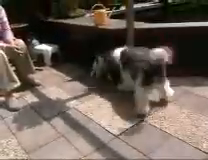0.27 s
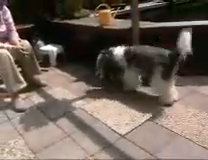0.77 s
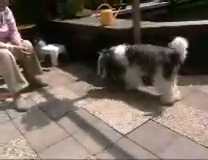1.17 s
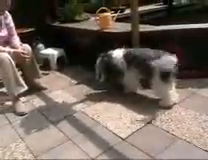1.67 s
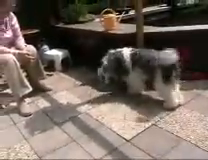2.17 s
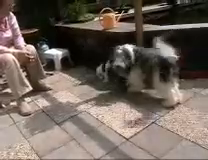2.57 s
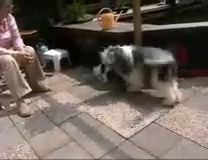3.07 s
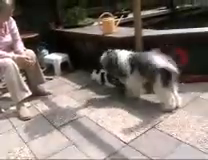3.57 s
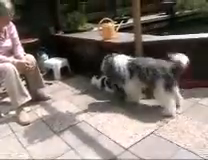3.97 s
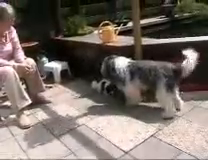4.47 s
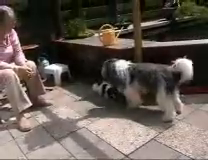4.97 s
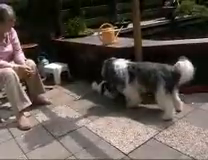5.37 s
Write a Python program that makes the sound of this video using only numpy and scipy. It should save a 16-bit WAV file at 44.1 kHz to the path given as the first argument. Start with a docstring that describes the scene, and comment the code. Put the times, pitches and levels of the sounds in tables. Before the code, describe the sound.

Six loud, rough barks from a big dog ring across a patio, over a faint hum and hiss.

```python
"""A dog barking on a patio

A big shaggy dog barks six times at a pup, over a low hum and faint hiss. Vocal-fold pulses and
turbulent breath excite its throat and mouth: each bark starts hoarse, leaps about an octave to a
rough note and sags. Between barks the dog huffs and claws tick on the slabs. Patio and garden
reverberate, and a limiter ducks everything after each loud bark."""
import sys
import numpy as np
from scipy import signal
from scipy.fft import rfft, irfft
from scipy.io import wavfile
from scipy.ndimage import uniform_filter1d, minimum_filter1d

SR = 44100
rng = np.random.default_rng(int(sys.argv[2]) if len(sys.argv) > 2 else 0)


def inscribe(sig):
    """Save sig as 16-bit PCM at rate SR to the path in sys.argv[1].

    A 1-D sig is mono; a 2-D sig holds one channel per row.
    Samples are clipped to [-1, 1] before scaling.
    """
    pcm = np.round(np.clip(np.atleast_2d(sig).T, -1, 1) * 32767)
    wavfile.write(sys.argv[1], SR, pcm.astype(np.int16))


N = 248705
TIME = np.arange(N) / SR
BINS = np.fft.rfftfreq(N, 1 / SR)
BAND_LIMIT_HZ = 8800


def gain_of(db):
    """The decibel scale: 20 dB is a factor of ten in amplitude."""
    return 10 ** (np.asarray(db) / 20)


def unit_rms(x):
    """Normalisation to a mean power of 1."""
    return x / np.sqrt(np.mean(x ** 2) + 1e-20)


def steadied(x, size=901):
    """Division by the short-term rms flattens the envelope but keeps the grain of single cycles."""
    window = signal.windows.hann(size)
    power = signal.convolve(x ** 2, window, "same") / signal.convolve(np.ones(len(x)), window, "same")
    return x / np.sqrt(abs(power) + 1e-12)


def curve_at(points, hz):
    """Interpolation of (frequency, value) points on a logarithmic frequency axis."""
    known_hz, values = np.transpose(points)
    return np.interp(np.log(hz + 1), np.log(known_hz + 1), values)


def add(mix, start, sound):
    """Superposition: a sound sums into the mix from its start time."""
    part = mix[max(round(start * SR), 0):][:len(sound)]
    part += sound[:len(part)]


def noise(spectrum):
    """Spectral shaping colours white noise; the result has rms 1."""
    return unit_rms(irfft(rfft(rng.standard_normal(N)) * gain_of(curve_at(spectrum, BINS)), N))


def wander(t, rate_hz):
    """Random modulation: low-passed noise with an rms near 1."""
    slow = irfft(rfft(rng.standard_normal(N)) / (1 + (BINS / rate_hz) ** 4), N)
    return unit_rms(slow)[:len(t)]


def resonate(x, hz, width_hz):
    """Two equal resonators in cascade give a peak with steep skirts."""
    b, a = signal.iirpeak(hz, hz / width_hz, SR)
    return signal.lfilter(b, a, signal.lfilter(b, a, x))


# swells and fades of the hum: (time [s], relative level [dB])
HUM_SWELLS = [(0.0, -52), (0.1, -49.5), (0.26, -46), (1.24, -46), (1.41, -50.5), (1.52, -45), (1.64, -66),
              (1.76, -45), (2.2, -51.5), (2.58, -54), (2.82, -42.5), (3.06, -42), (4.2, -43.5), (4.4, -40),
              (4.74, -50.5), (4.98, -46.5), (5.36, -44.5), (5.5, -56)]

def hum(hz=111.2, level_db=-1, waver_db=2.5, drift=0.0094, flutter=0.052, drone_db=-11):
    """A tone modulated in pitch and amplitude under a narrow-band drone, as of a distant motor."""
    swell_db = np.interp(TIME, *np.transpose(HUM_SWELLS)) + waver_db * wander(TIME, 5.7)
    cycles = np.cumsum(hz * (1 + drift * wander(TIME, 6.1))) / SR
    tone = unit_rms(np.sin(2 * np.pi * cycles) * (1 + flutter * wander(TIME, 42)))
    drone = gain_of(drone_db) * unit_rms(resonate(rng.standard_normal(N), hz=195, width_hz=89))
    return gain_of(level_db + swell_db) * (tone + drone)


# outdoor background: (frequency [Hz], relative spectral density [dB])
AIR_SPECTRUM = [(25, -25.5), (52, -6.5), (112, -4), (146, -10.5), (192, -6.5), (329, -12), (592, -18),
                (653, -13.5), (899, -16.5), (1180, -18.5), (1400, -16), (1790, -19.5), (5660, -25),
                (8800, -31.5), (11400, -52), (19400, -120)]
# likeness of the background at the two ears: (frequency [Hz], correlation [0-1])
AIR_CORRELATION = [(30, 0.57), (70, 0.92), (250, 1), (1000, 0.91), (3000, 0.72), (6000, 1)]

def air(level_db=-45, flicker_db=1.28):
    """Partial coherence: sum and difference of two noises give rumble and hiss alike in both ears."""
    correlation = curve_at(AIR_CORRELATION, BINS)
    mid = irfft(rfft(noise(AIR_SPECTRUM)) * np.sqrt((1 + correlation) / 2), N)
    side = irfft(rfft(noise(AIR_SPECTRUM)) * np.sqrt((1 - correlation) / 2), N)
    return np.array([mid + side, mid - side]) * gain_of(level_db + flicker_db * wander(TIME, 36))


# claws on the paving: (time [s], level [dB], centre frequency [Hz], decay time constant [s])
CLAW_TICKS = [(.25, -43.5, 4260, 0.0045), (2.114, -30, 5000, 0.0025), (2.33, -48, 5930, 0.0075),
              (2.843, -34, 3000, 0.0041), (3.011, -41, 2700, .006), (4.434, -41, 3510, 0.0095),
              (5.111, -44, 3720, 0.011), (5.198, -41, 4000, 0.0041), (5.346, -43.5, 4540, 0.013),
              (5.407, -42.5, 5600, 0.0057)]

def claws(width_hz=1500):
    """Impact noise: each claw gives a bright scratch that decays exponentially."""
    ticks, t = np.zeros(N), TIME[:3000]
    for start, db, hz, decay in CLAW_TICKS:
        scratch = unit_rms(resonate(rng.standard_normal(len(t)), hz, width_hz))
        add(ticks, start, gain_of(db) * np.exp(-t / decay) * scratch)
    return ticks


def step(t, centre, time_scale):
    """A sigmoid transition from 0 to 1."""
    return (1 + np.tanh((t - centre) / (2 * time_scale))) / 2


def articulation(row, release_s=0.04, release_db=-33, lead_in_db=-44, hoarse_mouth_hz=1231):
    """Folds and jaws move together: a hoarse start, a leap to the note, a gape, a sag as jaws close."""
    onset, length, lead_in, level_db, change_db = row[:5]
    hoarse_hz, top_hz, end_hz, leap_at, sag_at = row[5:10]
    start_rough, note_rough, start_throat_hz, note_mouth_hz = row[10:14]
    start_mouth_db, note_mouth_db, rasp_db, note_upper_db, hiss_db = row[14:]
    t = np.arange(-lead_in, length + release_s, 1 / SR)
    effort_db = level_db + np.interp(t, [0, length, length + release_s], [0, change_db, change_db + release_db])
    effort_db += lead_in_db * np.maximum(-t / lead_in, 0) ** 0.77  # creeps in, then jumps

    leap, sag = step(t, leap_at, 0.0115), step(t, sag_at, 0.0081)
    strain = np.sin(np.pi * leap) ** 2  # greatest in mid-leap
    gape = np.exp(-((t / sag_at - 0.72) / 0.15) ** 2)
    puff = np.exp(-((t - sag_at + 0.012) / 0.01) ** 2)  # a last breath just before the sag
    rasp_gone = step(t, leap_at + 0.028, 0.0047)

    sag_hz = (end_hz - top_hz) * sag
    pitch_hz = hoarse_hz + (top_hz - hoarse_hz) * leap + sag_hz
    # the voice clears in mid-leap and as it sags, and breaks up with the puff
    rough = start_rough + (note_rough - start_rough) * leap - 0.2 * strain + 0.19 * puff - 0.08 * sag
    rough = np.clip(rough, 0.1, 0.9)
    # formant tuning: the throat settles just above the note and follows part of the sag
    throat_hz = start_throat_hz + (top_hz + 67 - start_throat_hz) * leap + 0.38 * sag_hz
    mouth_hz = hoarse_mouth_hz + (note_mouth_hz - hoarse_mouth_hz) * leap
    flare_db, jaw_db = 8.5 * strain, 8 * gape - 3.5 * sag
    mouth_db = start_mouth_db + (note_mouth_db - start_mouth_db) * leap + flare_db + jaw_db
    upper_db = rasp_db + (note_upper_db - rasp_db) * rasp_gone + flare_db - 2 * puff
    hiss = gain_of(hiss_db) * (0.44 + 0.25 * strain + puff)
    return onset + t, effort_db, pitch_hz, rough, throat_hz, mouth_hz, mouth_db, upper_db, hiss


def vocal_folds(t, pitch_hz, rough, subharmonic=0.63):
    """Jitter, shimmer and period doubling roughen a harmonic pulse train; also returns its phase."""
    jitter = 0.07 * wander(t, 90) + 0.08 * wander(t, 320)
    phase = 2 * np.pi * np.cumsum(pitch_hz * (1 + rough * jitter)) / SR
    pulses = unit_rms(sum(np.cos(k * phase) * (k * pitch_hz < BAND_LIMIT_HZ) for k in range(1, 24)))
    doubling = subharmonic * np.cos(phase / 2)  # strong and weak cycles alternate
    shimmer = 0.7 * wander(t, 150)
    return pulses * (1 + rough * (doubling + shimmer)), phase


def formant(x, hz, width_hz):
    """A moving resonance by heterodyning: shift down to 0 Hz, smooth twice, shift back, level out."""
    carrier = np.exp(2j * np.pi * np.cumsum(hz) / SR)
    pole = np.exp(-np.pi * width_hz / SR)
    baseband = signal.lfilter([(1 - pole) ** 2], [1, -2 * pole, pole ** 2], x / carrier)
    return steadied((carrier * baseband).real)


# upper resonances of the vocal tract: (frequency [Hz], width [Hz], relative level [dB])
UPPER_FORMANTS = [(1920, 1100, 17), (2260, 270, 14), (2560, 530, 6)]
# the barks; leap and sag count from the onset, mouth and upper levels are relative to the throat:
# (onset of full voice [s], length [s], lead-in [s], effort [dB], change over the length [dB],
#  hoarse pitch [Hz], top pitch [Hz], end pitch [Hz], leap time [s], sag time [s],
#  start roughness [0-1], note roughness [0-1], start throat formant [Hz], note mouth formant [Hz],
#  start mouth level [dB], note mouth level [dB], start upper level [dB], note upper level [dB],
#  nose hiss [dB])
BARK_GESTURES = [ (0.347, 0.14, 0.046, -10, 1, 256.1, 727.6, 521, 0.028, 0.156, 0.42, 0.44, 820, 1220, -19, -14, -5.5, -5.5, -22.5),
                 (0.618, 0.1, 0.036, -5, 3, 301.7, 688.8, 476, 0.011, 0.1, 0.4, 0.29, 674, 1385, -4.5, -5.5, -6.5, -24.5, -27),
                 (1.780, 0.140, 0.019, -3, -8.5, 244.5, 690.5, 524.6, 0.019, 0.11, 0.35, 0.43, 660, 1423, -3.5, -4, -9, -13.5, -23.5),
                 (3.092, 0.170, 0.006, -2, -11.5, 332.2, 734.6, 649, 0.025, 0.116, 0.78, 0.482, 808, 1450, 9, -3, -3.5, -17, -22.5),
                 (3.400, 0.11, 0.0094, -3, -5, 321.8, 624, 538, 0.019, 0.126, 0.42, 0.19, 774, 1264, 0.5, -1, -8.5, -19, -28.5),
                 (3.797, 0.12, 0.00873, -4, -3.5, 335.5, 634.4, 564, 0.027, 0.11, 0.39, 0.2, 739, 1330, -2, -5.5, -12.5, -23, -25.5),
                 ]

def barks(low_hz=430, high_hz=3200, chest_db=-20, nose_hz=4550):
    """Source and filter: fold pulses and turbulent breath sound through throat, mouth and nose."""
    mix = np.zeros(N)
    voice_band = signal.butter(6, [low_hz, high_hz], "band", fs=SR, output="sos")
    for row in BARK_GESTURES:
        t, effort_db, pitch_hz, rough, throat_hz, mouth_hz, mouth_db, upper_db, hiss = articulation(row)
        pulses, phase = vocal_folds(t, pitch_hz, rough)
        breath = unit_rms((1 + 0.64 * np.cos(phase)) * rng.standard_normal(len(t)))
        source = (1 - rough) * pulses + rough * breath
        throat = formant(source, throat_hz, width_hz=250)
        mouth = formant(source, mouth_hz, width_hz=410)
        hoarse = source + 0.45 * breath  # turbulence takes over toward the treble
        upper = steadied(sum(gain_of(db) * resonate(hoarse, hz, w) for hz, w, db in UPPER_FORMANTS))
        voice = throat - gain_of(mouth_db) * mouth + gain_of(upper_db) * upper
        voice = steadied(signal.sosfilt(voice_band, voice))
        # the chest carries the fundamental at low pitch, and grows less with effort than the voice
        chest = gain_of(chest_db + effort_db / 2) * np.sin(phase) / (1 + (pitch_hz / low_hz) ** 4)
        nose = hiss * unit_rms(resonate(breath, nose_hz, width_hz=1700))
        bark = gain_of(effort_db) * (voice + nose) + chest
        add(mix, t[0], bark * signal.windows.tukey(len(t), 0.03))
    return mix


def swell(peak_s, length_s):
    """A Gaussian envelope; its length spans the points at 1/e of the peak."""
    return np.exp(-(2 * (TIME - peak_s) / length_s) ** 2)


def squeak(peak_s=0.468, length_s=0.065, hz=1126, level_db=-15, octave_db=-22, waver=0.01):
    """Biphonation: in the first bark, part of the folds vibrates briefly at a pitch of its own."""
    phase = 2 * np.pi * np.cumsum(hz * (1 + waver * wander(TIME, 60))) / SR
    tone = gain_of(level_db) * np.sin(phase) + gain_of(octave_db) * np.sin(2 * phase)
    return swell(peak_s, length_s) * tone


# voiceless breaths: (peak time [s], level [dB], length [s])
HUFF_BREATHS = [(2.505, -44, 0.1), (2.799, -47.5, 0.097), (4.321, -45.5, 0.14), (4.716, -46.5, 0.065),
                (5.07, -48.5, 0.1), (5.625, -46.5, 0.057)]
# breath shaped by the mouth: (frequency [Hz], relative level [dB])
HUFF_SPECTRUM = [(300, -69), (800, -1), (1400, 13.5), (1900, 0.5), (2600, 2.5), (4000, -11), (8000, -44)]

def huffs():
    """Turbulence noise: short breaths rush through the dog's open mouth."""
    envelope = sum(gain_of(db) * swell(peak, length) for peak, db, length in HUFF_BREATHS)
    return envelope * noise(HUFF_SPECTRUM)


def reverberation(bands, build_up_s, spread):
    """A diffuse stereo field builds up, then decays exponentially, each band at its own rate."""
    bands, size = np.array(bands), 2 * SR
    hz, t, spectra = signal.stft(rng.standard_normal((2, size)), SR, nperseg=2048)
    decay_rate = np.log(1000) / curve_at(bands[:, [0, 2]], hz)[:, None]
    unit_energy = np.sqrt(2 * decay_rate / SR)
    band_gain = gain_of(curve_at(bands[:, :2], hz))[:, None]
    spectra *= unit_energy * band_gain * np.exp(-decay_rate * t)
    _, tail = signal.istft(spectra, SR, nperseg=2048)
    mid, side = tail[:, :size] * (1 - np.exp(-TIME[:size] / build_up_s))
    return np.array([mid + spread * side, mid - spread * side])


# the patio's short ring and the garden's long one: (frequency [Hz], level [dB], reverberation time [s])
PATIO_RING = [(150, -22, 0.58), (675, -2.5, 0.43), (1380, -14.5, 0.53), (2590, -11.5, 0.5),
              (5000, -2.5, 0.39), (8500, -4.5, 0.087)]
GARDEN_RING = [(150, -42, 1.5), (498, -28, 3.3), (622, -45.5, 5.4), (653.4, -13, 2.21), (781, -24.5, 0.67),
               (1360, -24, 0.75), (2600, -26, 0.28), (8000, -31.5, .6)]
# echoes off paving, wall and house: (delay [s], left gain [ratio], right gain [ratio])
REFLECTIONS = [(.0029, 0.36, -0.067), (.0083, -0.32, -0.45), (.0147, 0.29, 0.25), (.0235, .14, .06),
               (.036, 0.045, -0.16)]
# the dog's direction: (time [s], left minus right level [dB])
DOG_BALANCE = [(.5, 2), (1.8, 0.5), (3.2, 0.5), (3.9, 0.5)]

def outdoors(x):
    """Convolution with an impulse response: direct sound, early reflections and two diffuse tails."""
    response = reverberation(PATIO_RING, build_up_s=0.0033, spread=0.24)
    response += reverberation(GARDEN_RING, build_up_s=0.045, spread=0.17)
    response[:, 0] += 1  # direct sound
    for delay, left, right in REFLECTIONS:
        response[:, round(delay * SR)] += left, right
    lean_db = np.interp(TIME, *np.transpose(DOG_BALANCE)) / 2
    return signal.fftconvolve(x[None], response, axes=1)[:, :N] * gain_of([lean_db, -lean_db])


def scene():
    """Superposition of the dog, with its reverberation, and the hum and air."""
    dog = huffs() + claws() + squeak() + barks()
    return outdoors(dog) + hum() + air()


def limiter(x, threshold_db=-15.5, attack_db_per_s=800, hold_s=0.14, release_db_per_s=70):
    """Slew-limited gain control: above the threshold the gain falls, holds, then climbs back."""
    power_db = 10 * np.log10(abs(uniform_filter1d((x ** 2).mean(0), 130)) + 1e-12)
    over_db = np.maximum(power_db - threshold_db, 0)
    size = 2 * int(hold_s * SR / 2) + 1
    held_db = -minimum_filter1d(-over_db, size, origin=size // 2, mode="nearest")
    climb, fall = TIME * release_db_per_s, TIME * attack_db_per_s
    wanted_db = np.maximum.accumulate(held_db + climb) - climb
    cut_db = np.minimum.accumulate(wanted_db - fall) + fall
    return x / gain_of(uniform_filter1d(cut_db, size=90))


def overdrive(x, ceiling=0.42, bias=0.3):
    """Asymmetric saturation: peaks that outrun the limiter clip with a crack and a thump."""
    rail = ceiling * (1 - bias * np.sign(x))
    return x / (1 + (x / rail) ** 8) ** (1 / 8)


# narrow dips in the microphone's response: (frequency [Hz], width [Hz], depth [0-1])
RESPONSE_DIPS = [(863, 26, 0.62), (1780, 44, 0.84)]

def record(dry, bass_cut_hz=62):
    """Limiting and saturation, then linear filtering: notches, bass roll-off and a band limit."""
    clipped = overdrive(limiter(dry))
    notches = [1 - depth / (1 + 2j * (BINS - hz) / width) for hz, width, depth in RESPONSE_DIPS]
    s = 1j * BINS / bass_cut_hz
    high_pass = s ** 2 / (s ** 2 + np.sqrt(2) * s + 1)
    coloured = irfft(rfft(clipped) * np.prod(notches, axis=0) * high_pass, N)
    low_pass = signal.firwin(1001, BAND_LIMIT_HZ, window=("kaiser", 8), fs=SR)
    return signal.oaconvolve(coloured, low_pass[None], "same")


dry = scene()
out = record(dry)
inscribe(out)
```